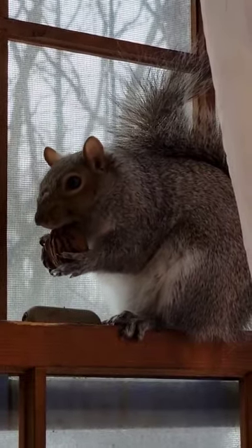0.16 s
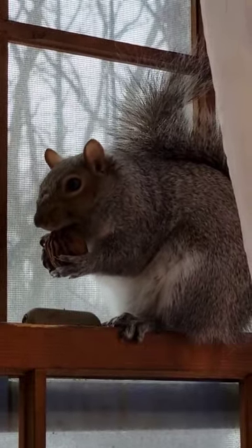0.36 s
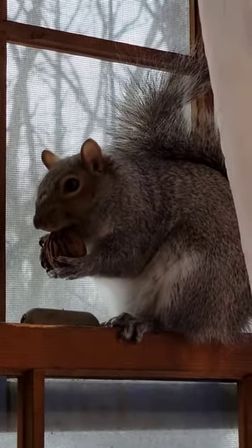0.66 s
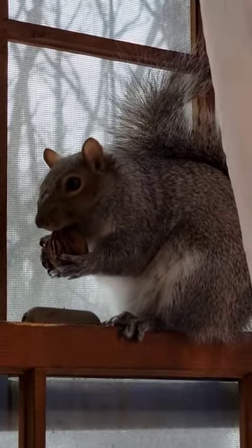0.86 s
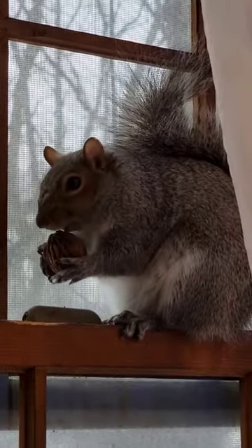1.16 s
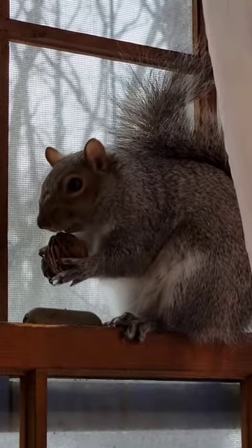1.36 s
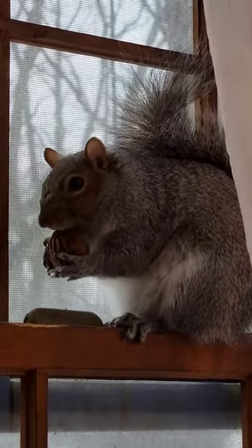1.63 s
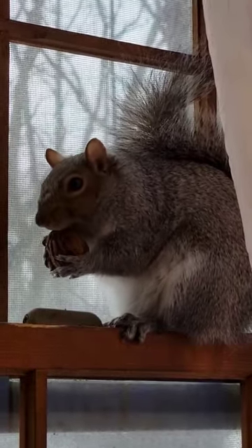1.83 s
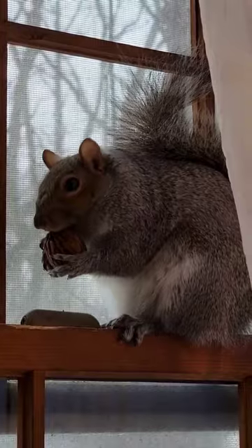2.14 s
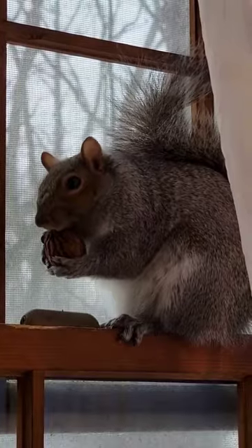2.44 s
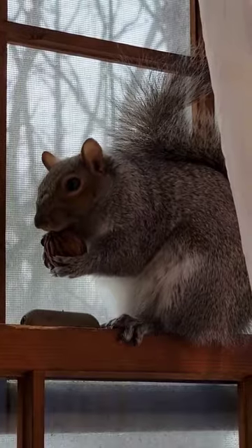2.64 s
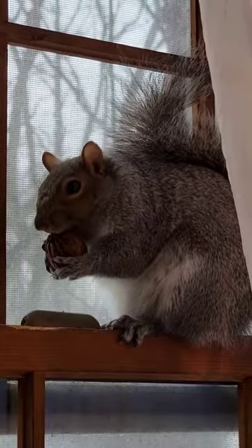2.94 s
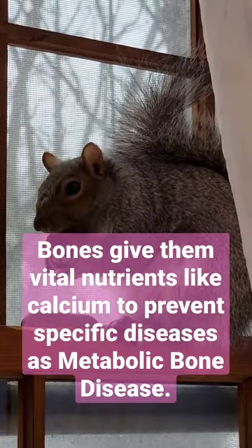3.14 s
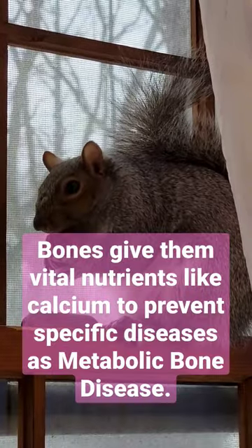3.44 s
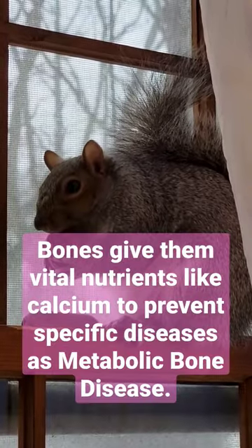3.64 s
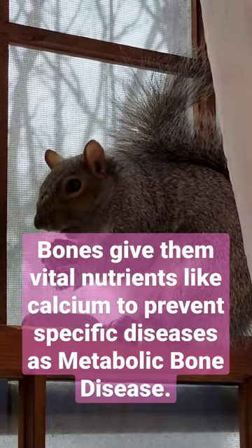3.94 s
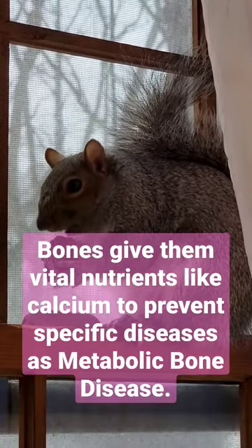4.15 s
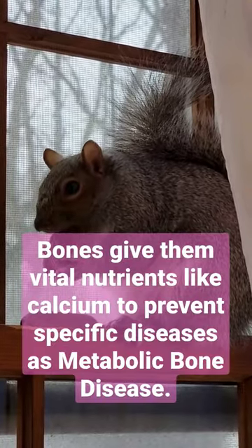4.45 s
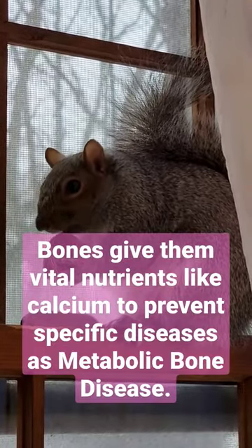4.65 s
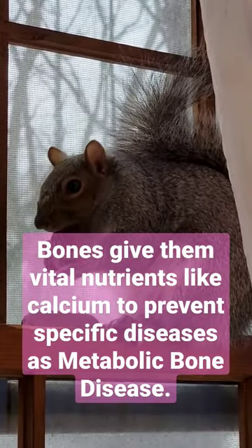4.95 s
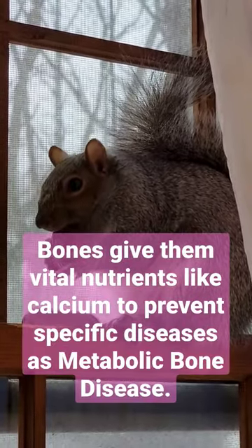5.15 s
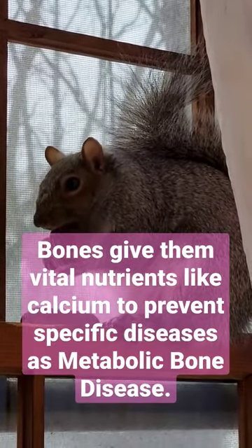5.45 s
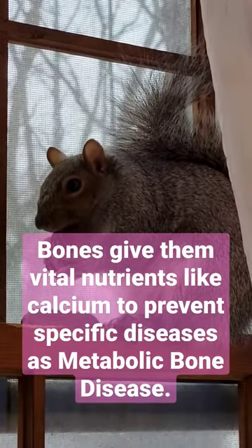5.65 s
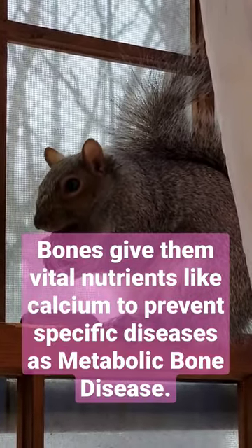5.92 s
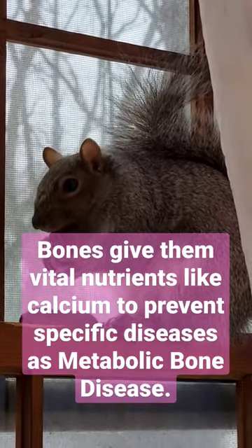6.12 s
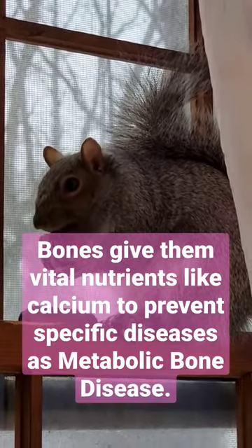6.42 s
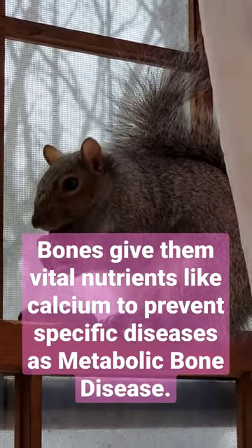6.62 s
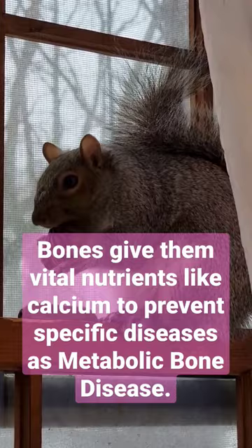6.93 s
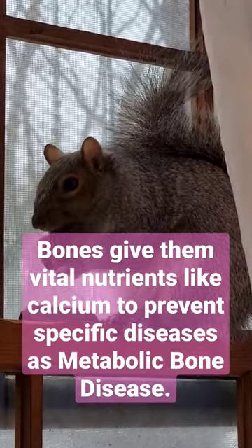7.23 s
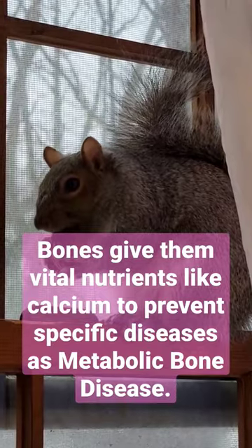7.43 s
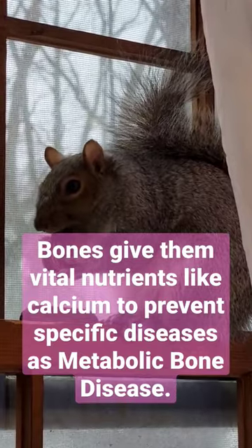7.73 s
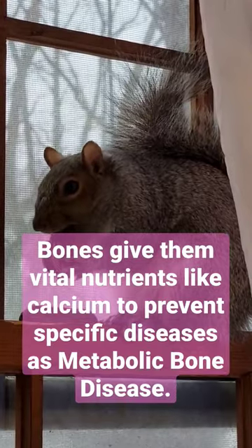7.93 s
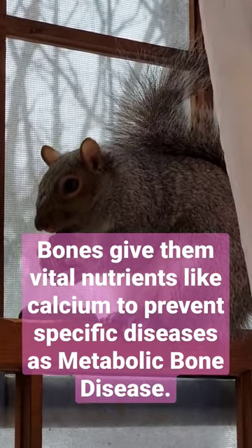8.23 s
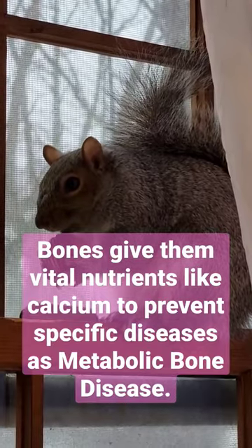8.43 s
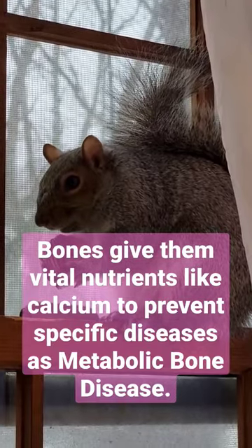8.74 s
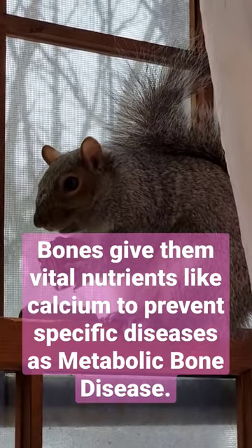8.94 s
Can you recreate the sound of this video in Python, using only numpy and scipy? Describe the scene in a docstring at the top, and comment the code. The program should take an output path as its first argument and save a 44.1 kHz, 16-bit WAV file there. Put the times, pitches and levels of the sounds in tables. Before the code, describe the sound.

Close, rapid scrapes and clicks of a squirrel's teeth on a nutshell, pausing briefly, with a soft steady hum indoors.

```python
"""Squirrel gnawing a shell

A squirrel on a wooden ledge gnaws a hard shell close to a phone. Each stroke of the incisors is a run
of tiny slips, with single snaps where a chip breaks off. The shell rings, the window bay answers
briefly, and an air blower hums over the room's hiss."""
import sys
import numpy as np
from scipy import signal
from scipy.fft import rfft, irfft, next_fast_len
from scipy.io import wavfile
from scipy.ndimage import uniform_filter1d, map_coordinates

SR = 44100
rng = np.random.default_rng(int(sys.argv[2]) if len(sys.argv) > 2 else 0)


def output_pcm(signal):
    """Save a mono or channel-first signal as 16-bit PCM at the path in sys.argv[1].

    Samples are clipped to [-1, 1] before scaling.
    """
    pcm = np.clip(np.atleast_2d(signal).T, -1, 1) * 32767
    wavfile.write(sys.argv[1], SR, np.round(pcm).astype(np.int16))


N = 400415
STROKE_SAMPLES = 24576  # room for one stroke and its echo
LEFT_RIGHT = np.array([[.5], [-.5]])  # splits a left-minus-right amount between the channels


def amp(db):
    """Decibels to gain."""
    return 10 ** (np.asarray(db) / 20)


def unit(x):
    """Scaled to rms 1."""
    return x / np.sqrt(np.mean(x ** 2) + 1e-20)


def curve(points, hz):
    """Breakpoints of (freq_hz, value), read on a log frequency axis."""
    freqs, values = np.transpose(points)
    return np.interp(np.log(hz + 1), np.log(freqs + 1), values)


def filtered(x, response):
    """x through a filter given as a function of frequency."""
    size = next_fast_len(N + SR // 2)
    return irfft(rfft(x, size) * response(np.fft.rfftfreq(size, 1 / SR)), size)[..., :N]


def modes(table):
    """Response of a bank of damped resonators with alternating polarity."""
    return lambda hz: sum(
        (-1) ** k * amp(db) * 1j * hz * width / (pitch ** 2 - hz ** 2 + 1j * hz * width)
        for k, (pitch, width, db) in enumerate(table))


def unit_energy(response):
    """The response scaled so that a unit impulse comes out with energy 1."""
    scale = np.sqrt(np.mean(np.abs(response(np.linspace(0, SR / 2, num=4096))) ** 2))
    return lambda hz: response(hz) / scale


# Stereo likeness of the room tone: freq_hz, correlation
ROOM_CORRELATION = [(60, 0.93), (130, 0.99), (290, 0.92), (640, 0.67), (1410, -0.37), (3100, -0.22),
                    (6820, 0.099), (15000, -0.06)]


def room_noise(response, flicker_db):
    """Coloured stereo noise of rms 1 whose level flickers in patches of time and frequency."""
    spectra = signal.stft(rng.standard_normal((2, N)), nperseg=1024)[2]
    patches = uniform_filter1d(rng.standard_normal(spectra.shape[1:]), size=6, axis=0)
    patches = uniform_filter1d(patches, size=5, axis=1)
    noise = signal.istft(spectra * amp(flicker_db * unit(patches)), nperseg=1024)[1][:, :N]
    angle = lambda hz: np.arccos(curve(ROOM_CORRELATION, hz)) / 2
    mid, side = filtered(noise, lambda hz: response(hz) * [np.cos(angle(hz)), np.sin(angle(hz))])
    return unit(np.array([mid + side, mid - side]))


# Colour of the room's hiss: freq_hz, level_db
HISS_EQ = [(470, -12.5), (800, -7), (1040, -16), (1110, -8.5), (1540, -10), (1660, -14), (1880, -12),
           (2260, -13.5), (3060, -13), (3510, -18), (6570, -23.5), (8340, -39.5), (14500, -36),
           (15400, -46), (16000, -59)]


def room_hiss():
    """A soft bed of distant hiss."""
    return amp(-54.5) * room_noise(lambda hz: amp(curve(HISS_EQ, hz)), flicker_db=2.0)


# Colour of the moving air: freq_hz, level_db
RUMBLE_EQ = [(20, -36), (40, -21), (56, -6), (300, -7), (400, -13.5), (800, -21), (950, -26), (1300, -50),
             (2200, -120)]
# Duct and room resonances, before sharpening: pitch_hz, width_hz, level_db
DUCT_MODES = [(64.4, 36, -4.5), (112, 22.2, -4.5), (139.6, 25.2, -4.5), (168, 29, -3.5), (206.6, 17.5, 0),
              (278.2, 35.6, -4.5), (353, 20.7, -5.5), (474, 33, -13), (624, 30, -11.5), (718, 13, -10),
              (756, 8.9, -11.5), (900, 7.5, -19.5), (1001, 58, -13)]


def blower():
    """Moving air rumbles, and hums in the resonances of duct and room."""
    rumble = amp(-53) * room_noise(lambda hz: amp(curve(RUMBLE_EQ, hz)), flicker_db=1.24)
    sharpened = lambda hz: np.abs(modes(DUCT_MODES)(hz)) ** 1.735
    low_cut = lambda hz: (hz / 50) ** 4 / (1 + (hz / 50) ** 4)
    hum = amp(-48.5) * room_noise(lambda hz: sharpened(hz) * low_cut(hz), flicker_db=0.2)
    return rumble + hum


# Pan of the room tone: freq_hz, left_minus_right_db
ROOM_PAN = [(60, 2), (99, -3), (160, -1.5), (270, -2), (450, 0.5), (740, -1.0), (1220, -0.5), (2010, -4),
            (3330, -8.5), (5500, -5), (9080, 0), (15000, -2)]


def room_tone():
    """Blower and hiss together, each band leaning to one side."""
    return filtered(blower() + room_hiss(), lambda hz: amp(LEFT_RIGHT * curve(ROOM_PAN, hz)))


# Decay of the window bay: freq_hz, t60_s
BAY_DECAY = [(1000, 0.29), (3000, 0.17), (7000, 0.16), (15000, 0.17)]
# Send level into the echo: freq_hz, level_db
BAY_SEND = [(1200, -9.5), (3000, -8), (6500, -5), (12000, -4)]
# Stereo likeness of the echo: freq_hz, correlation
BAY_CORRELATION = [(1200, 0.72), (2300, 0.9), (3200, 0.2), (4500, 0.048), (12000, 0.039)]


def bay_echo(hz, slap_t60_s=0.014, predelay_s=0.0025):
    """Stereo response of the bay: a quick slap off glass and frame, then a tail whose lows last longest."""
    bands_hz, t, noise = signal.stft(rng.standard_normal((2, SR // 4)), SR, nperseg=64)
    angle = np.arccos(curve(BAY_CORRELATION, bands_hz))[:, None] / 2
    mid, side = noise[0] * np.cos(angle), noise[1] * np.sin(angle)
    slap = amp(-60 * t / slap_t60_s)
    tail = amp(-12 - 60 * t / curve(BAY_DECAY, bands_hz)[:, None])
    echo = signal.istft(np.array([mid + side, mid - side]) * (slap + tail), SR, nperseg=64)[1]
    response = rfft(echo / np.linalg.norm(echo[0]), STROKE_SAMPLES)
    return amp(curve(BAY_SEND, hz)) * response * np.exp(-2j * np.pi * hz * predelay_s)


# Pan of the gnawing: freq_hz, left_minus_right_db
PORT_PAN = [(60, -1.0), (92, 0.0), (140, -2.5), (210, 8), (330, 1), (500, -10), (770, -17), (1170, 1.5),
            (1790, -2), (2740, -2), (4190, -6.5), (6410, -5), (9810, 3), (15000, -0.5)]
# Phase between the microphone ports: freq_hz, left_lead_rad
PORT_PHASE = [(1100, 1.2), (2300, -1.3), (3100, 1), (4500, 1.9), (6400, 3.5), (7700, 4.5), (9500, 7),
              (12900, 9.5), (15000, 14.5)]


def microphone_ports(hz):
    """The two ports hear the gnawing at different levels and phases."""
    return amp(LEFT_RIGHT * curve(PORT_PAN, hz)) * np.exp(1j * LEFT_RIGHT * curve(PORT_PHASE, hz))


def tooth_slips(rate_hz, spread_db, grit, clump_db, clump_samples=400):
    """Stick-slip force of a tooth: uneven impulses over fine grit, bunched in clumps, rms 1."""
    slipping = rng.random(N) < rate_hz / SR
    strength = amp(spread_db * np.clip(rng.standard_normal(N), -2, 2))
    clumps = map_coordinates(rng.standard_normal(N // clump_samples + 4), [np.arange(N) / clump_samples])
    scrape = unit(slipping * strength) + grit * rng.standard_normal(N)
    return unit(scrape * amp(clump_db * clumps))


def stroke_span(bite_s, rise_s, hold_s, release_s=0.07):
    """Start and stop sample of a stroke, from first touch to the end of its release."""
    return round((bite_s - 1.05 * rise_s) * SR), round((bite_s + hold_s + release_s) * SR)


# Strokes of the incisors; swell spans the hold, and the last three levels are offsets from the ring:
# full_bite_s, rise_s, hold_s, ring_db, swell_db, middle_db, upper_db, edge_db
TOOTH_STROKES = [(0.069, 0.03, 0.0088, -42, 8.5, -19, -7.5, -12),
                 (0.223, 0.017, 0.013, -34.5, 3, -12, -13, -9),
                 (0.39, 0.022, 0.035, -42, -12, -19, -6.5, -12),
                 (0.563, 0.022, 0.057, -41.5, -10.5, -10.5, -8.5, -14),
                 (0.786, 0.021, 0.002, -42, 2, -6, -3, -11), (0.931, 0.024, 0.0091, -39, 0, -11, -9, -10),
                 (1.12, 0.028, 0.004, -42.5, -1, -12, -9, -14),
                 (1.881, 0.0068, 0.003, -49, -12, -15, -16, -26),
                 (2.054, 0.011, 0.002, -46.5, 0, -6, -3, -4),
                 (2.264, 0.0065, 0.0024, -44, -13, -28, -28, -27),
                 (2.522, 0.018, 0.002, -47, 2, -11, 1.5, -7.5), (2.67, 0.015, 0.002, -43, 1, -2.5, -1, -5),
                 (2.826, 0.02, 0.0018, -35.5, -2, 0.5, -10, -8), (2.967, 0.027, 0.042, -39, 0, -3, -6, -9),
                 (3.154, 0.017, 0.041, -30.5, 4, -6.5, -2.5, -7.5),
                 (3.373, 0.026, 0.002, -40, 3.5, -1, -2, -12),
                 (3.532, 0.01, 0.012, -37.5, 3, -23, -12, -15.5),
                 (3.746, 0.049, 0.0062, -33.5, 15, -1, -6, -4.5),
                 (3.937, 0.033, 0.007, -39.5, 10.5, -13, -8.5, -15),
                 (4.526, 0.024, 0.013, -49.5, -5, -19, -15, -17),
                 (4.975, 0.016, 0.0037, -31.5, -3, -19, -12, -14),
                 (5.128, 0.019, 0.033, -37.5, 6, -17, -9, -11),
                 (5.308, 0.023, 0.027, -26, -3, -11, -9.5, -8.5),
                 (5.486, 0.029, 0.031, -26.5, 1, -6.5, -6.5, -6),
                 (5.661, 0.014, 0.023, -31, -5.5, -12, -9.5, -9.5),
                 (5.842, 0.033, 0.036, -36.5, -2.5, -11.5, -12, -12.5),
                 (6.014, 0.019, 0.029, -38, -10, -10.5, -10, -8.5),
                 (6.199, 0.02, 0.041, -29.5, -3.5, -11, -5, -5.5),
                 (6.42, 0.064, 0.016, -34, -3, -12, -6, -11.5),
                 (6.603, 0.024, 0.025, -29, -2, -8, -6.5, -8),
                 (6.781, 0.026, 0.028, -40.5, -3, -8.5, -10.5, -12.5),
                 (6.953, 0.018, 0.033, -28.5, 1.5, -7.5, -9.5, -9.5),
                 (7.149, 0.035, 0.03, -30.5, -5, -3.5, -14, -8.5),
                 (7.33, 0.024, 0.038, -28, -2, -5.5, -7, -9),
                 (7.526, 0.022, 0.027, -30.5, 2, -10, -5.5, -10),
                 (7.72, 0.018, 0.035, -28.5, -0.5, -11, -10, -10),
                 (7.931, 0.028, 0.016, -29.5, -5, -9.5, -11.5, -11.5),
                 (8.123, 0.027, 0.016, -26, 0, -8, -11, -15.5)]
# Brightening against the ring across a hold: knock_db, middle_db, upper_db, edge_db
HOLD_BRIGHTENING = [5.5, 6.5, 5, 5.5]
# Part of the rise already made at first touch: knock_share, middle_share, upper_share, edge_share
HEAD_START = [0, .1, .2, .35]


def tooth_strokes(rise_db=18, arch_db=1, release_db_per_s=802):
    """The teeth dig in, hold and lift. Rows of force: ring, knock, middle, upper, edge."""
    force = np.zeros((5, N))
    slips = tooth_slips(rate_hz=650, spread_db=3, grit=.6, clump_db=1.2)
    for bite_s, rise_s, hold_s, level_db, swell_db, *offsets_db in TOOTH_STROKES:
        start, stop = stroke_span(bite_s, rise_s, hold_s)
        t = np.arange(start, stop) / SR - bite_s
        hold_position = np.clip(t / hold_s, 0, 1) - .5
        attack_db = rise_db * np.minimum(t, 0) / rise_s
        held_db = level_db + swell_db * hold_position + arch_db * np.cos(np.pi * hold_position)
        ring_db = attack_db + held_db - release_db_per_s * np.maximum(t - hold_s, 0)
        knock_db = -14 - 0.39 * (level_db + 38)  # the knock falls behind the ring in harder bites
        layers_db = ring_db + np.c_[[knock_db, *offsets_db]]
        layers_db += np.c_[HOLD_BRIGHTENING] * hold_position - np.c_[HEAD_START] * attack_db
        force[:, start:stop] += amp([ring_db, *layers_db]) * slips[start:stop]
    return force


# Chips breaking off the shell: start_s, ring_db, upper_db, edge_db
CHIP_SNAPS = [(0.0698, -39, -19, -32), (0.2267, -23, -4, -23), (0.234, -16, -5.5, -10),
              (0.416, -31, -29, -23), (0.6226, -37, -16, -32), (0.7898, -18, -13, -20.5),
              (0.943, -14, -11.5, -28), (1.1217, -12.5, -26, -40), (2.0541, -12.5, -18, -22),
              (2.2613, -16.5, -48, -42), (2.523, -26, -17.5, -36), (2.6682, -12, -9.5, -16),
              (2.824, -7.5, -2.5, -10), (2.963, -12, -10, -15), (2.971, -3, -2, -12),
              (2.999, -3.5, -2.5, -7), (3.159, -21, -8, -12), (3.175, -1, -11, -21), (3.1984, -6, -1.5, -4),
              (3.379, -9, -14, -8), (3.553, -14, -15, -24), (3.73, -9.5, -12, -13), (3.7507, -3.5, -3, -6),
              (3.7574, -3.5, 1.5, -8), (4.9752, -9, -14, -39), (4.53, -24, -39, -45),
              (5.1245, -22, -14, -19), (5.297, -11, -13, -32), (5.3106, -20, -18, -18),
              (5.4822, -4, -9, -18), (5.5058, -8, -9, -15), (5.518, -15, -1.5, -17), (5.661, -9, -22, -17),
              (6.045, -28, -15, -20), (6.1935, -12, -25, -27), (6.2147, -18, -12, -23),
              (6.417, -10, -18, -23), (6.4208, -23, -17, -16), (6.4314, -9, -9.5, -10),
              (6.586, -14, -22, -24), (6.6047, -15, -7, -21), (6.955, -10, -28, -29),
              (6.9988, -11, -22, -25), (7.147, -7, -25, -24), (7.1772, -14, -8, -17),
              (7.323, -21, -27, -30), (7.363, -21, -20, -18), (7.53, -25, -22, -29), (7.72, -11, -27, -14),
              (7.7458, -1, -21, -27), (7.931, -7, -29, -32), (8.133, -7, -10.5, -20)]


def chip_snaps():
    """Each chip lets go in one impulse. Rows of force: ring, knock, middle, upper, edge."""
    force = np.zeros((5, N))
    for start_s, ring_db, upper_db, edge_db in CHIP_SNAPS:
        force[:, round(start_s * SR)] += amp([ring_db, ring_db - 15, ring_db - 21.5, upper_db, edge_db])
    return force


def regripped(table, spread_db, detune=0.012):
    """The paws take a new grip on the shell: every mode shifts a little in pitch and strength."""
    pitch_hz, width_hz, level_db = np.transpose(table)
    shift, change = rng.standard_normal((2, len(table)))
    gripped = np.transpose([pitch_hz * (1 + detune * shift), width_hz, level_db + spread_db * change])
    return unit_energy(modes(gripped))


# The shell's low knock, main ring, middle ring and upper ring: pitch_hz, width_hz, level_db
KNOCK_MODES = [(1142, 127, -5.5), (1415, 41, -0.5), (1760, 85, 1), (1920, 80, -2)]
RING_MODES = [(2320, 54, 7), (2560, 98, -16), (2734, 124, 9), (2925, 138, 15), (3090, 56, -3),
              (3620, 160, -30.5), (3746, 310, 0.5)]
MIDDLE_MODES = [(4364, 230, 1.3), (4907, 196, 8.6), (4972, 340, 6.8)]
UPPER_MODES = [(6200, 30, -10), (6830, 200, 1), (6830, 290, 2.5)]
# Wide, fast-dying modes, the tooth's tick and a brighter clack: pitch_hz, width_hz, level_db
TICK_MODES = [(3048, 1180, 0)]
CLACK_MODES = [(5030, 870, -19), (6416, 524, 4), (7200, 540, -5)]
# Colour of the hiss at the biting edge: freq_hz, level_db
EDGE_EQ = [(4470, -16), (7600, -5), (8640, -13), (9340, -6), (10500, -7.5), (12000, -2), (15100, -8.5),
           (16000, 2.5), (16400, -61)]


def shell_responses(hz):
    """How the shell answers force in one grip: ring, knock, middle, upper, edge."""
    tick = unit_energy(lambda f: modes(TICK_MODES)(f) ** 2)(hz)  # resonates twice, in tooth and shell
    clack = unit_energy(modes(CLACK_MODES))(hz)
    ring = amp(-2) * tick + amp(-3) * regripped(RING_MODES, spread_db=1.6)(hz)
    knock = regripped(KNOCK_MODES, spread_db=1.6)(hz)
    middle = regripped(MIDDLE_MODES, spread_db=1.6)(hz)
    upper = clack + amp(-8) * regripped(UPPER_MODES, spread_db=2.5)(hz)
    edge = unit_energy(lambda f: amp(curve(EDGE_EQ, f)))(hz)
    return [ring, knock, middle, upper, edge]


def gnawing(ledge_delay_s=0.000624, preroll_samples=512):
    """Strokes and snaps ring the shell, heard directly, off the ledge and by way of the bay."""
    force = tooth_strokes() + chip_snaps()
    hz = np.fft.rfftfreq(STROKE_SAMPLES, 1 / SR)
    ports = microphone_ports(hz)
    ledge_bounce = amp(-18) * np.exp(-2j * np.pi * hz * ledge_delay_s)
    near = amp(-4) * (1 + ledge_bounce)
    mix = np.zeros((2, N + 2 * STROKE_SAMPLES))
    for stroke in TOOTH_STROKES:
        start, stop = stroke_span(*stroke[:3])
        bite = np.pad(force[:, start:stop], ((0, 0), (preroll_samples, 0)))
        shell = np.sum(rfft(bite, STROKE_SAMPLES) * shell_responses(hz), axis=0)
        mix[:, start:start + STROKE_SAMPLES] += irfft(shell * ports * (near + bay_echo(hz)))
    return mix[:, preroll_samples:N + preroll_samples]


def scene():
    """Close gnawing over the room tone."""
    return gnawing() + room_tone()


def record(dry, rolloff_hz=15700, band_limit_hz=16600):
    """The microphone rolls off the top treble; the phone keeps nothing above its band limit."""
    return filtered(dry, lambda hz: (hz < band_limit_hz) / (1 + (hz / rolloff_hz) ** 60))


dry = scene()
out = record(dry)
output_pcm(out)
```